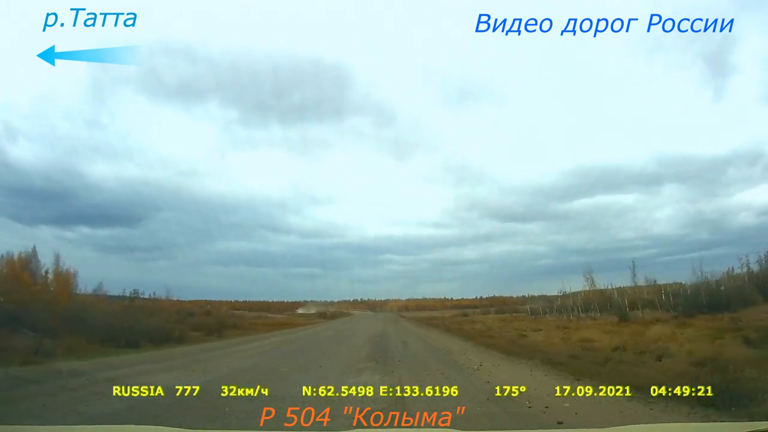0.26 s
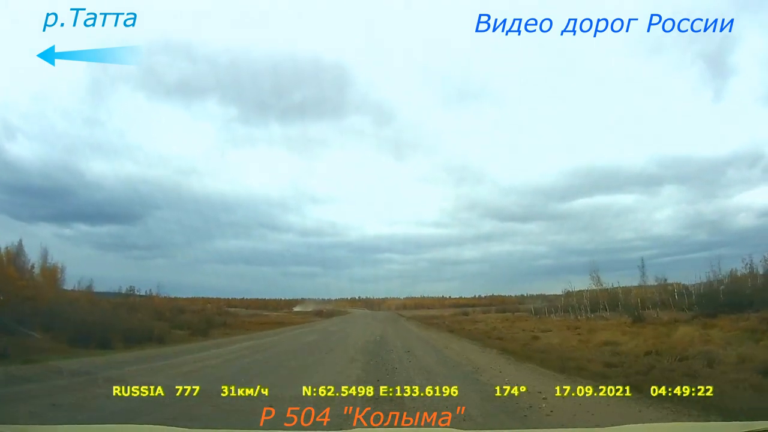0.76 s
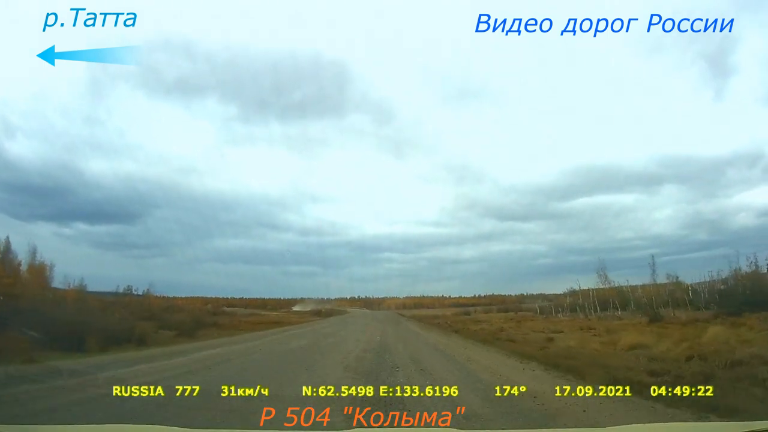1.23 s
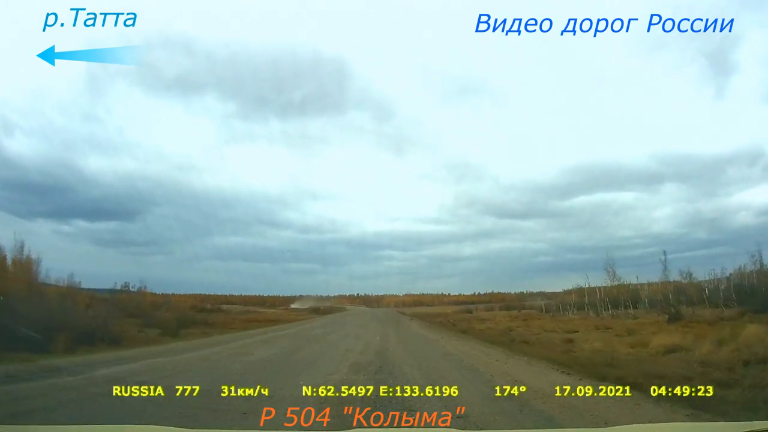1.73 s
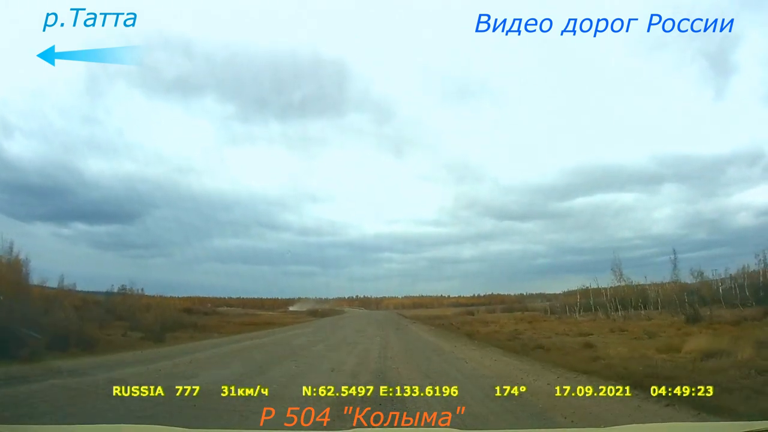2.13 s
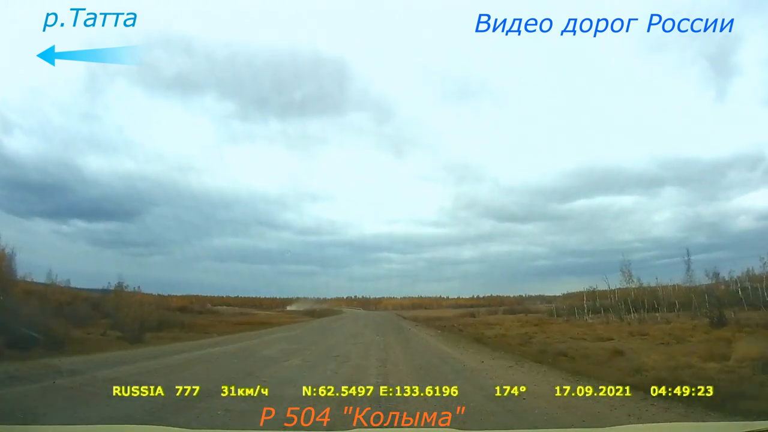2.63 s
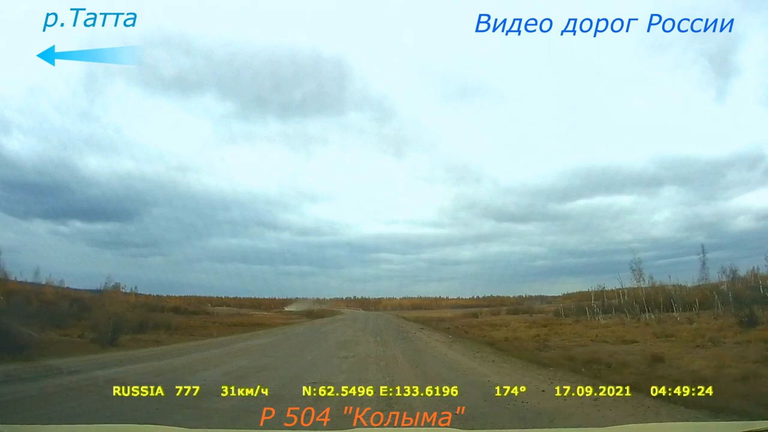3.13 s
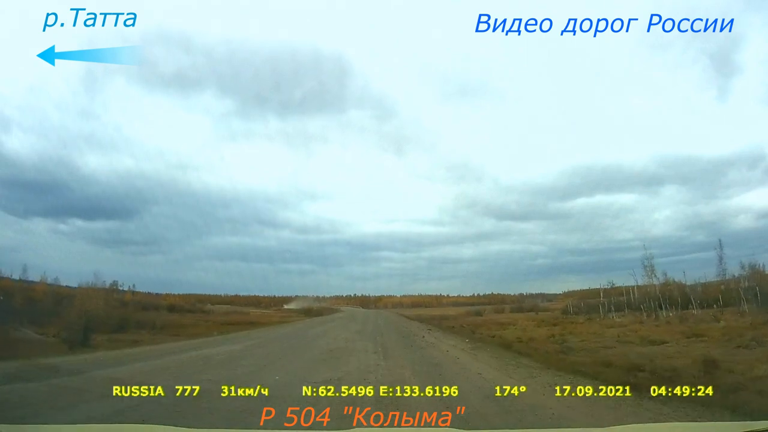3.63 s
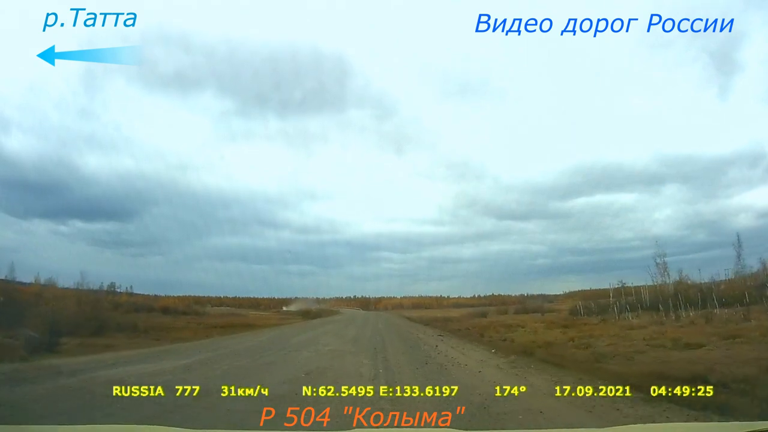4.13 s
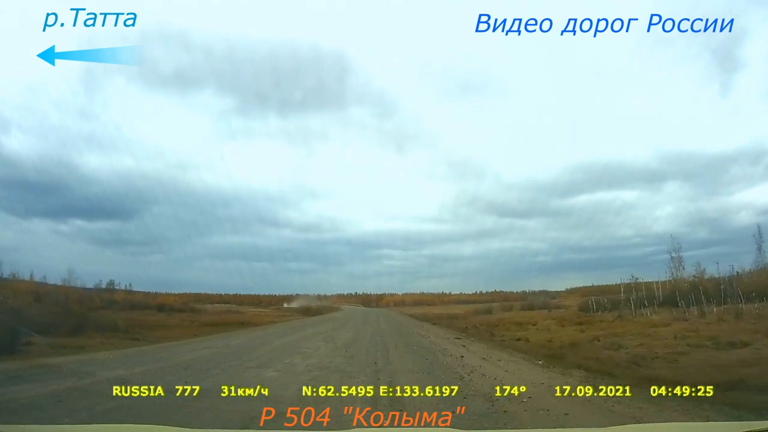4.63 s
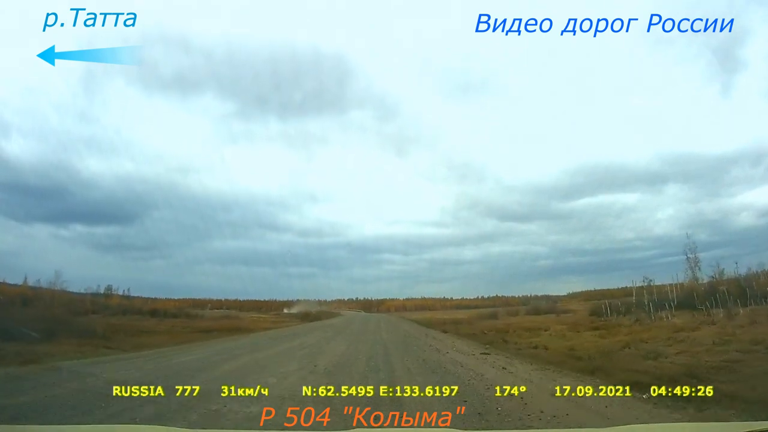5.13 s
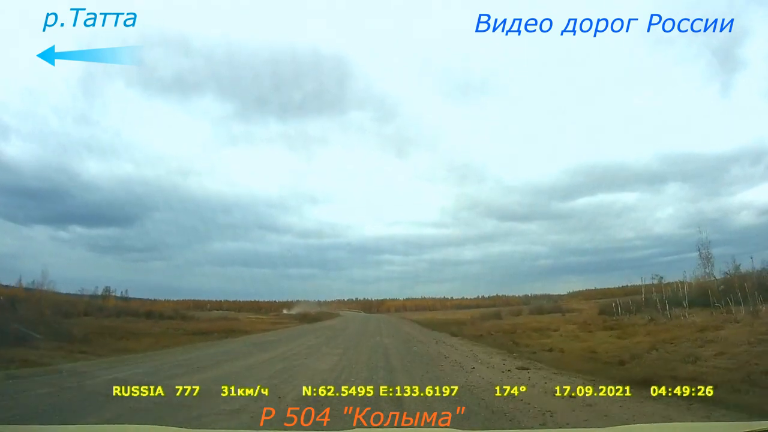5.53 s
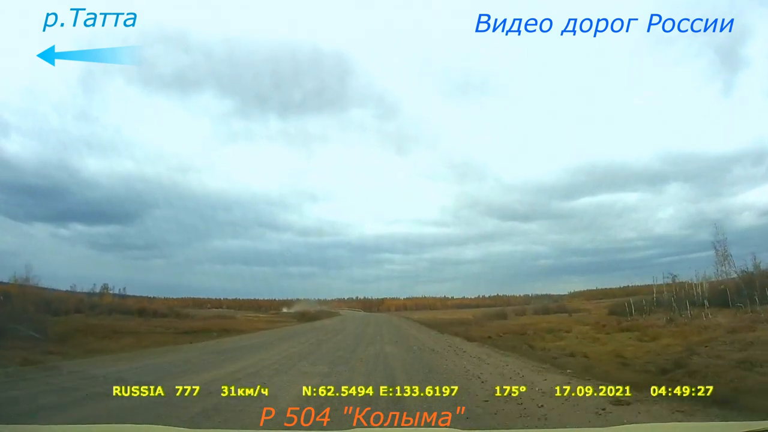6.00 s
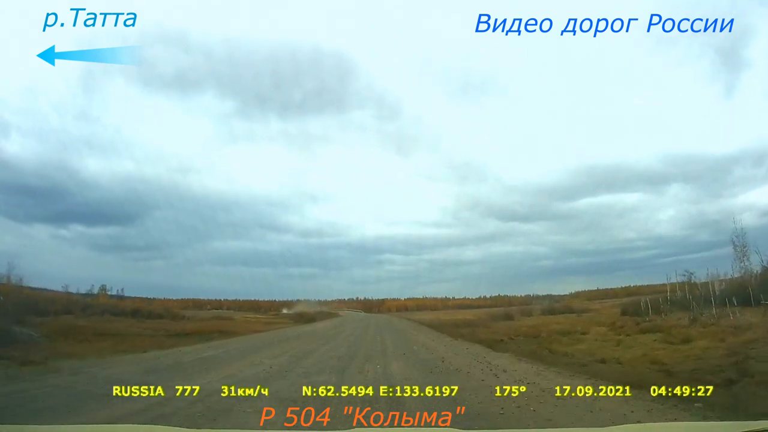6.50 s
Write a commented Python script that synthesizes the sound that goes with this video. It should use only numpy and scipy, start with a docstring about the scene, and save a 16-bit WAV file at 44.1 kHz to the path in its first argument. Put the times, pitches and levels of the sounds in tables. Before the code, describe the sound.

Inside a slowly moving car, close to the windscreen, for about seven seconds. Throughout, tyres crunch on gravel with a grainy, midrange, boxed-in texture, over deep body shaking, a low cabin drone and a faint wavering engine hum. Pebbles tick, sand fizzes lightly and loose trim rattles. From 0 to 1.4 s the crunch is moderate, with a strong low lurch and small knocks near 0.25 s. Jolts cluster around 1.5-1.75 s, then scatter from 2 to 3.5 s with further dips. From 3.7 s the road roughens: booming thuds and ringing clatter build to the loudest, hardest crash at about 4.2 s, easing after 4.6 s. From 5 to 6 s it is calmer; bumps and knocks return at 6.3-6.7 s. Steady hiss, a very thin high whine and tiny high chirps twice a second persist; big bass swings sound flattened and choked.

```python
"""Slow car on a gravel road

A car rolls slowly along gravel, heard from a camera at the windscreen. Random clicks, filtered, crunch as stones.
Filtered noise shakes the body and drones in the cabin; dips set the wheels hopping and ruts thud and boom.
Sine waves hum as the engine. Jolts clatter as runs of ringing knocks, loudest on a rough patch after four seconds.
The widest bass swings overload the microphone; filtered noise and tones make hiss, a thin whine and
a faint electrical chirp about twice a second."""
import sys
import numpy as np
from scipy import signal
from scipy.fft import rfft, irfft, next_fast_len
from scipy.io import wavfile
from scipy.ndimage import uniform_filter1d

SR = 44100
rng = np.random.default_rng(int(sys.argv[2]) if len(sys.argv) > 2 else 0)


def file_out(sig):
    """Save sig as 16-bit WAV at sys.argv[1]."""
    # one column per channel
    cols = np.atleast_2d(sig).T
    # limit, then scale
    lim = np.clip(cols, -1, 1)
    pcm = np.round(lim * 32767).astype(np.int16)
    wavfile.write(sys.argv[1], SR, pcm)


N = 298116
TIME = np.arange(N) / SR


def gain_of(db):
    """Turns decibels into a factor."""
    return 10 ** (np.asarray(db) / 20)


def evened(x):
    """Scales a sound to an rms of one."""
    return x / np.sqrt(np.mean(x ** 2) + 1e-20)


def add(mix, s, sound):
    """Mixes a sound in at time s, in seconds."""
    part = mix[max(round(s * SR), 0):][:len(sound)]
    part += sound[:len(part)]


def slope(points, hz):
    """Gain of a spectrum given as (Hz, dB) points, joined on a log-frequency axis."""
    f, db = np.transpose(points)
    return gain_of(np.interp(np.log(hz + 1), np.log(f), db))


def humps(modes, hz):
    """Gain of a set of resonances, each a peak that falls away on both sides; their powers add."""
    power = 0
    for f, width, db in modes:
        peak = gain_of(db) / (1 + 2 * ((hz - f) / (width + 1)) ** 2)
        power = power + peak ** 2
    return np.sqrt(power)


def colour(x, gain_at, size=16384):
    """Causal (minimum-phase) filter with the given gain over frequency: blows start sharply and ring out."""
    hz = abs(np.fft.fftfreq(size, 1 / SR))
    log_gain = np.log(np.maximum(gain_at(hz), 1e-5))
    ring = np.fft.ifft(np.exp(np.conj(signal.hilbert(log_gain)))).real[:size // 2]
    return signal.fftconvolve(x, ring)[:len(x)]


def wander(rate_hz):
    """Smooth random wavering with an rms of one, up to about the given rate."""
    hz = np.fft.rfftfreq(N, 1 / SR)
    keep = (hz > 1) / (1 + (hz / rate_hz) ** 4)
    return evened(irfft(rfft(rng.standard_normal(N)) * keep, N))


def steadied(x, seconds):
    """Takes the slow swells out of a noise, so that the level given to it decides how loud it is."""
    size = max(int(seconds * SR), 2)
    power = uniform_filter1d(uniform_filter1d(x ** 2, size), size)
    return x / np.sqrt(power + 1e-20)


def impacts(per_s, spread_db):
    """Random clicks of uneven size and either sign."""
    chance = rng.random(N)
    size = np.minimum(rng.exponential(1, N), 3.5)
    clicks = (chance < per_s / SR) * gain_of(spread_db * size)
    return evened(clicks * rng.choice([-1, 1], N))


def spell(s, length):
    """Envelope of a spell of shaking: it rises, holds until its length is over and settles."""
    rise_s, settle_s = 0.025, 0.032
    rise = np.clip((TIME - s) / rise_s, 0, 1)
    return rise * np.exp(-np.maximum(TIME - s - length, 0) / settle_s)


def with_spells(level_db, spells):
    """Adds the power of spells of shaking to a level in dB."""
    gain = gain_of(level_db)
    for s, db, length, *_ in spells:
        gain = np.hypot(gain, gain_of(db) * spell(s, length))
    return 20 * np.log10(gain)


def rumble(modes, level_db, steady_s):
    """Random shaking rings low resonances; the springs keep out the slowest motion, below about 8 Hz."""
    def gain_at(hz):
        return humps(modes, hz) * hz ** 2 / (hz ** 2 + 8 ** 2)
    # one second extra, cut off again, lets the ringing build up first
    shaking = colour(rng.standard_normal(N + SR), gain_at, size=32768)[SR:]
    return gain_of(level_db) * steadied(shaking, steady_s)


USUAL_CRUNCH_DB = -33.5  # ordinary gravel
# How coarse the road is under the wheels.
# Each row: time in seconds, gravel crunch level in dB (before a small trim); levels in between are joined up.
ROAD_COARSENESS = [(0, -32.5), (0.55, -33.3), (1.3, -33), (1.62, -30.5), (1.85, -31.5), (2.15, -32.5),
                   (2.42, -31), (2.8, -34), (3.28, -30.5), (3.39, -35.5), (3.46, -29.5), (3.85, -29),
                   (3.94, -31.5), (4.03, -29), (4.17, -23.5), (4.3, -24.5), (4.41, -29.5), (4.66, -32),
                   (5.0, -31.5), (5.89, -34), (6.03, -32.5), (6.38, -29.5), (6.76, -31)]


def road():
    """Crunch, drone, shake and thud levels in dB: all follow the coarseness of the road."""
    crunch_db = np.interp(TIME, *np.transpose(ROAD_COARSENESS))
    extra_db = crunch_db - USUAL_CRUNCH_DB
    # level on ordinary gravel, plus the dB gained for each dB of extra crunch
    drone_db = -35 + 0.56 * extra_db
    shake_db = -25 + 0.27 * extra_db
    thud_db = -47.5 + 1 * extra_db
    return crunch_db, drone_db, shake_db, thud_db


# Low resonances of the body on its tyres and mounts.
# Each row: pitch in Hz, width in Hz (1 is added), relative strength in dB.
BODY_MODES = [(16.64, 3.44, 4.5), (36.2, 15.2, -2)]


def body_shake(level_db):
    """The road shakes the body on its tyres and mounts: random noise rings its low resonances."""
    return rumble(BODY_MODES, level_db, steady_s=0.049)


# How the wheels bounce on their springs.
# Each row: pitch in Hz, width in Hz (1 is added), relative strength in dB.
HOP_MODES = [(18.36, 2.86, 3.5), (26, 2.7, -3), (40.2, 6.6, -2)]
# Dips in the road.
# Each row: start in seconds, level of the shaking in dB, length in seconds.
ROAD_DIPS = [(0, -21, 0.12), (0.23, -14, 0.084), (0.454, -20, 0.052), (1.903, -23, 0.16),
             (2.328, -18.5, 0.17), (2.615, -16, 0.078), (3.04, -21.5, 0.26), (3.498, -22, 0.2),
             (3.858, -19, 0.496), (4.432, -19, 0.082), (4.828, -20, 0.2), (5.293, -21.5, 0.085),
             (6.126, -17.5, 0.36), (6.621, -15.5, 0.29)]


def wheel_hop():
    """The wheels hop on their springs: always a little, and harder at each dip."""
    return rumble(HOP_MODES, with_spells(-41, ROAD_DIPS), steady_s=0.13)


# Boom of the air in the cabin.
# Each row: pitch in Hz, width in Hz (1 is added), relative strength in dB.
CABIN_MODES = [(58.5, 33, -11.5), (82.4, 36, 0.5), (106, 20, -8.5), (128.4, 28, -2), (178, 94, -12),
               (293, 110, -19)]


def cabin_drone(level_db):
    """Random shaking makes the cabin air resonate in a low drone that follows the road."""
    return rumble(CABIN_MODES, level_db, steady_s=0.25)


FIRING_HZ = 41.63  # average firing rate of the slowly turning engine
# Overtones of the firing rate.
# Each row: multiple of the firing rate, level in dB around which it wavers.
ENGINE_OVERTONES = [(2, -55.5), (3, -48)]


def engine(waver=0.006, uneven_db=2.5):
    """A low hum on the overtones of the firing rate, wavering under a light foot."""
    turns = np.cumsum(FIRING_HZ * (1 + waver * wander(3.4))) / SR
    hum = np.zeros(N)
    for multiple, db in ENGINE_OVERTONES:
        tone = evened(np.sin(2 * np.pi * round(multiple) * turns))
        hum += gain_of(db + uneven_db * wander(8)) * tone
    return hum


# Panels that ring under the stones.
# Each row: pitch in Hz, width in Hz (1 is added), relative strength in dB.
RINGING_PANELS = [(495, 210, -10.5), (1076, 140, 0.5), (1321, 127, 1.5), (1553, 72, 2), (1644, 42, -10.5),
                  (1940, 42, -7.5), (4040, 150, -16)]


def shell(hz, blow):
    """The path from the wheels into the cabin: the blow's own band plus ringing panels, dull above 5.6 kHz."""
    return np.hypot(slope(blow, hz), humps(RINGING_PANELS, hz)) / (1 + (hz / 5600) ** 10)


# How fine gravel under the tread sounds through floor and glass.
# Each row: frequency in Hz, relative strength in dB.
FINE_CRUNCH = [(120, -45), (260, -10), (400, -10.5), (680, -10.5), (900, -3.5), (1150, -5.5), (1450, -1.5),
               (1790, -1), (1860, -10.5), (2150, -10.5), (2700, -18), (3400, -19), (4300, -18),
               (5000, -39.5)]
# How a big stone sounds, fuller and broader.
# Each row: frequency in Hz, relative strength in dB.
STONE_KNOCK = [(100, -20), (200, -4), (370, -7), (485, 2.5), (660, -11.5), (1000, 5.5), (1500, -4),
               (2000, -3.5), (2400, -12), (2900, -17), (4300, -24), (5000, -49)]


def gravel(level_db, sand_db=-8, clump_db=1.22, clump_hz=55, coarse_from_db=-26.5, coarse_over_db=1.85,
           trim_db=0.47):
    """Fine gravel crunches in clumps; the rougher the road, the more big stones join in."""
    clumps = gain_of(clump_db * wander(clump_hz))
    grit = impacts(per_s=1000, spread_db=0.5) + gain_of(sand_db) * rng.standard_normal(N)
    fine = steadied(colour(grit * clumps, lambda hz: shell(hz, FINE_CRUNCH)), 0.19)
    big_stones = impacts(per_s=600, spread_db=2.5)
    coarse = steadied(colour(big_stones * clumps, lambda hz: shell(hz, STONE_KNOCK)), 0.062)
    # share of the power that comes from big stones: half at coarse_from_db
    share = 1 / (1 + np.exp((coarse_from_db - level_db) / coarse_over_db))
    return gain_of(level_db + trim_db) * (np.sqrt(1 - share) * fine + np.sqrt(share) * coarse)


# What the suspension rings with when coarse stones pound it.
# Each row: pitch in Hz, width in Hz (1 is added), relative strength in dB.
SUSPENSION_MODES = [(182, 43, -0.5), (244, 59, -15), (486, 120, -12)]
# Ruts that pound the suspension and, in booms() below, make the floor boom.
# Each row: start in seconds, thud level in dB, length in seconds, boom level in dB, boom pitch in Hz.
ROAD_RUTS = [(1.02, -39, 0.065, -35, 134), (1.485, -49, 0.23, -33.5, 111), (1.905, -46, 0.16, -40, 128),
             (3.39, -43, 0.07, -33, 124), (3.727, -30.5, 0.12, -32.5, 120), (4.07, -36, 0.27, -33, 144),
             (5.948, -54, 0.044, -32, 120), (6.258, -38, 0.13, -36, 143), (6.58, -35, 0.19, -40, 150)]


def thuds(level_db, per_s=220, spread_db=2, steady_s=0.05):
    """Coarse stones pound the suspension and make it ring; ruts add to the thuds."""
    pounding = colour(impacts(per_s, spread_db), lambda hz: humps(SUSPENSION_MODES, hz))
    return gain_of(with_spells(level_db, ROAD_RUTS)) * steadied(pounding, steady_s)


def cabin_echoes(x, bounce=0.52):
    """Quick echoes between the cabin's glass and trim blur each blow without changing its colour."""
    size = next_fast_len(N + SR // 4)
    hz = np.fft.rfftfreq(size, 1 / SR)
    spectrum = rfft(x, size)
    for round_trip_s in (0.001089, 0.0019, 0.0034):
        trip = np.exp(-2j * np.pi * hz * round_trip_s)
        # an all-pass: it spreads the sound in time but keeps every frequency's strength
        spectrum = spectrum * (trip - bounce) / (1 - bounce * trip)
    return irfft(spectrum, size)[:N]


def pebbles(level_db, per_s=20, below_db=-21, count=6):
    """Pebbles flung from the tread tick on the wheel arches, each spot at its own pitch."""
    ticks = np.zeros(N)
    for f in np.geomspace(2000, 4100, count):
        clicks = impacts(per_s, spread_db=-5.0)
        spot = colour(clicks, lambda hz: humps([(f, 450, 0)], hz), size=2048)
        ticks += spot * f ** -.8  # higher spots are weaker
    return gain_of(level_db + below_db) * evened(ticks)


# Sand sprayed against the underbody.
# Each row: frequency in Hz, relative strength in dB.
SAND_SPRAY = [(2000, -13), (4500, 0.5), (9000, 3), (15000, -38)]


def spray(level_db, below_db=-22, follows=0.62, per_s=3000, spread_db=7.0):
    """Sand thrown up by the tread fizzes faintly, in gusts, growing less than the crunch does."""
    gusts = gain_of(2.5 * wander(22))
    fizz = colour(impacts(per_s, spread_db) * gusts, lambda hz: slope(SAND_SPRAY, hz))
    spray_db = USUAL_CRUNCH_DB + follows * (level_db - USUAL_CRUNCH_DB) + below_db
    return gain_of(spray_db) * evened(fizz)


def rattles(level_db, per_s=7, below_db=-11, width_hz=90, count=7):
    """Loose trim ticks as the car shakes, each piece ringing briefly at its own pitch."""
    ticks = np.zeros(N)
    for f in np.geomspace(1000, 1700, count):
        clicks = impacts(per_s, spread_db=1.5)
        ticks += colour(clicks, lambda hz: humps([(f, width_hz, 0)], hz), size=4096)
    return gain_of(level_db + below_db) * evened(ticks)


# Microphone hiss.
# Each row: frequency in Hz, relative strength in dB.
MIC_HISS = [(100, 10.5), (2500, -2), (5000, 5), (7000, 3.5), (10000, 3.5), (13000, 3), (16000, 2.5)]


def electronics(hiss_db=-42.5, whine_hz=7882, whine_db=-67):
    """Steady microphone hiss, made of filtered noise, with one thin steady whine."""
    hiss = evened(colour(rng.standard_normal(N), lambda hz: slope(MIC_HISS, hz)))
    whine = evened(np.sin(2 * np.pi * whine_hz * TIME))
    return gain_of(hiss_db) * hiss + gain_of(whine_db) * whine


# The blow of a jolt, hard and thin.
# Each row: frequency in Hz, relative strength in dB.
JOLT_BLOW = [(150, -12), (480, 0), (680, -4), (950, 2.5), (1500, 0.5), (2300, -2.5), (2900, -18),
             (4300, -12), (5000, -32)]
# Jolts that set the cabin clattering.
# Each row: start in seconds, level in dB (before a trim), middle of the ring pitch in Hz, length in seconds.
CABIN_JOLTS = [(0.081, -28.5, 1270, 0.02), (0.25, -27, 1490, .028), (0.309, -25.5, 1140, 0.019),
               (0.788, -30, 1400, .012), (0.813, -32, 1530, 0.011), (1.158, -32, 1350, 0.024),
               (1.502, -27, 1220, 0.0076), (1.545, -27, 1150, 0.012), (1.575, -25, 1530, .009),
               (1.651, -24, 1100, 0.012), (1.725, -23.5, 1230, 0.0099), (1.987, -29, 1260, 0.019),
               (2.035, -28.5, 1350, 0.01), (2.206, -29.5, 1350, .011), (2.357, -26, 1340, 0.021),
               (2.423, -26, 1360, .009), (2.555, -29.5, 1090, 0.013), (2.674, -26.5, 1610, 0.0078),
               (3.146, -22.5, 1540, 0.005), (3.225, -29.5, 1500, 0.024), (3.277, -28.5, 1350, 0.024),
               (3.334, -26.5, 1290, 0.0067), (3.469, -28, 1070, .012), (3.631, -31, 1130, 0.028),
               (3.713, -25.5, 1220, .009), (3.763, -25, 1610, 0.014), (3.803, -23, 1070, .03),
               (3.84, -22, 1060, 0.009), (3.867, -22, 1220, 0.023), (3.987, -25, 1300, 0.0098),
               (4.096, -22.5, 1340, .03), (4.158, -16, 1130, 0.012), (4.174, -20.5, 1190, .03),
               (4.236, -11.5, 1470, .011), (4.293, -18.5, 1270, 0.0083), (4.307, -21, 1170, 0.02),
               (4.363, -18, 1410, .014), (4.388, -28, 1400, .012), (4.456, -20.5, 1600, 0.00825),
               (4.466, -22, 1300, 0.019), (4.516, -20.5, 1500, 0.01), (4.535, -27, 1400, .014),
               (4.564, -29, 1060, .012), (4.724, -31, 1330, 0.0072), (4.866, -29.5, 1020, .011),
               (4.962, -25, 1080, .016), (5.009, -31, 1270, 0.013), (6.332, -20.5, 1130, 0.022),
               (6.4, -22, 1350, .013), (6.432, -37, 1510, 0.027), (6.489, -29, 1100, 0.023),
               (6.678, -25, 1250, 0.033), (6.731, -25.5, 1200, .02)]


def clatter(ring_width_hz=290, ring_db=17.0, trim_db=-1.37, fade_db=-3, swell_s=0.0014,
            tail_db=-7, tail_t60=0.081, size=4096):
    """A jolt is a run of knocks that swells and fades; each rings near its pitch and dies away in the cabin."""
    knock_gap_s, pitch_scatter = 0.0024, 0.15
    out, t = np.zeros(N), np.arange(size) / SR
    click = signal.unit_impulse(size // 2)
    for s, db, hz, length in CABIN_JOLTS:
        count = 1 + int(length / knock_gap_s)
        run = np.zeros(size)
        for k, (late, spot, side) in enumerate(rng.uniform(-1, 1, (count, 3))):
            place = (k + late / 2 if k else 0) / count  # 0 at the start of the jolt, 1 at its end
            pitch = hz * (1 + pitch_scatter * spot)
            swell = 1 - np.exp(-(place * length + knock_gap_s) / swell_s)

            def gain_at(f):
                return shell(f, JOLT_BLOW) * (3.5 + humps([(pitch, ring_width_hz, ring_db)], f))
            knock = evened(colour(click, gain_at, size=4096))
            add(run, place * length, np.sign(side) * swell * gain_of(fade_db * place) * knock)
        tail = rng.standard_normal(size) * gain_of(-60 * t / tail_t60)
        tail = tail / np.linalg.norm(tail)
        run = run + gain_of(tail_db) * signal.fftconvolve(run, tail)[:size]
        # longer jolts carry more energy
        run = run * np.sqrt(length * SR / np.sum(run ** 2))
        add(out, s, gain_of(db + trim_db) * run)
    return out


# Moments at which the camera's electronics chirp.
# Each row: middle of the chirp in seconds, level of the tone in dB.
CAMERA_CHIRPS = [(0.429, -43.5), (0.880, -45), (1.399, -45), (1.881, -44), (2.233, -44), (2.745, -47.5),
                 (3.227, -46), (3.670, -44), (4.083, -45), (4.534, -46), (4.935, -44), (5.370, -43),
                 (5.855, -46), (6.642, -43)]


def chirps(tone_hz=9465, length_s=0.012, flutter=0.14):
    """A short fluttering tone inside a longer, weaker puff of fizz, which is noise around the same pitch."""
    fizz_db, fizz_width_hz, fizz_s = -1, 1600, 0.055
    tone_gate, fizz_gate = np.zeros(N), np.zeros(N)
    for s, db in CAMERA_CHIRPS:
        add(tone_gate, s - length_s / 2, gain_of(db) * signal.windows.tukey(int(length_s * SR), .7))
        add(fizz_gate, s - fizz_s / 2, gain_of(db) * np.hanning(int(fizz_s * SR)))
    wave = np.sin(2 * np.pi * tone_hz * TIME + .2 * wander(90))
    tone = evened(wave * (1 + flutter * wander(330)))
    fizz = evened(colour(rng.standard_normal(N), lambda hz: humps([(tone_hz, fizz_width_hz, 0)], hz)))
    return tone_gate * tone + gain_of(fizz_db) * fizz_gate * fizz


def booms(width_hz=24, steady_s=0.031):
    """Each rut makes the floor boom in one surge, as noise around its own pitch."""
    out = np.zeros(N)
    for s, _, length, db, hz in ROAD_RUTS:
        out += spell(s, length) * rumble([(hz, width_hz, 0)], db, steady_s)
    return out


def overload(x, limit=0.23, leak=0.4):
    """The microphone flattens the widest bass swings, and chokes the rest for as long as each one lasts."""
    bass_hz, knee = 200, 8
    bass = signal.sosfiltfilt(signal.butter(2, bass_hz, fs=SR, output="sos"), x)
    excess = 1 + (abs(bass) / limit) ** knee
    flattened = bass / excess ** (1 / knee)
    choked = (x - bass) * (leak + (1 - leak) / excess)
    return flattened + choked


def scene():
    """Everything that reaches the one microphone, with its hiss and the electronics."""
    crunch_db, drone_db, shake_db, thud_db = road()
    shake = body_shake(shake_db) + wheel_hop()
    drone = cabin_drone(drone_db) + engine() + booms()
    stones = cabin_echoes(gravel(crunch_db) + thuds(thud_db)) + pebbles(crunch_db) + spray(crunch_db)
    mix = shake + drone + stones + rattles(crunch_db) + clatter() + chirps() + electronics()
    return mix[None]


def record(dry):
    """The microphone overloads; the converter rests a little off zero and cuts the top of the treble."""
    offset, edge_hz = 0.12, 15780
    low_pass = signal.firwin(1023, edge_hz, window=("kaiser", 9), fs=SR)
    return offset + signal.oaconvolve(overload(dry), low_pass[None], "same")


dry = scene()
out = record(dry)
file_out(out)
```